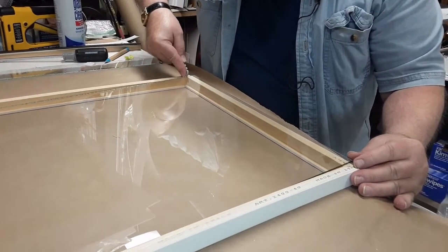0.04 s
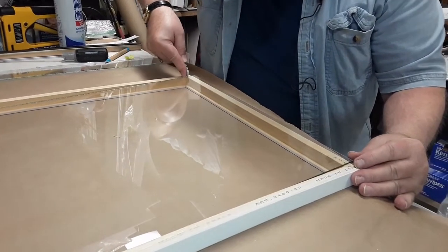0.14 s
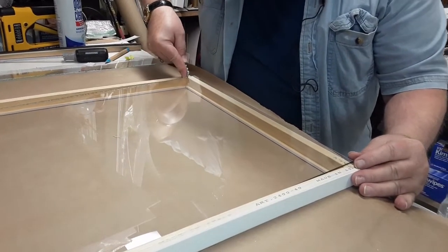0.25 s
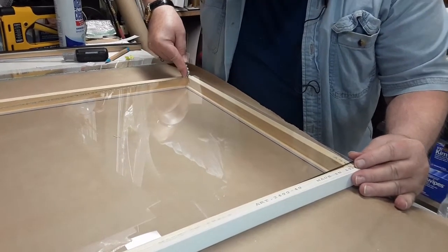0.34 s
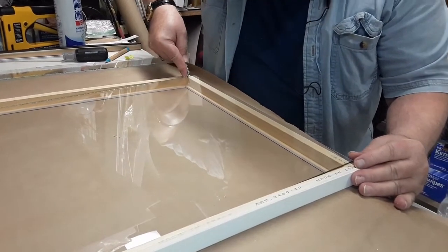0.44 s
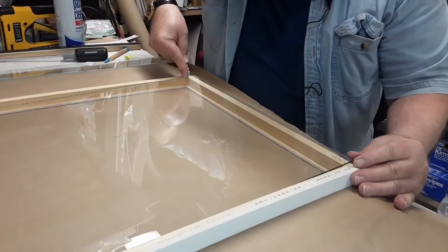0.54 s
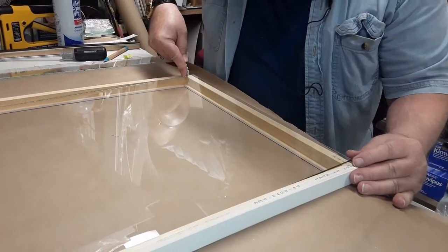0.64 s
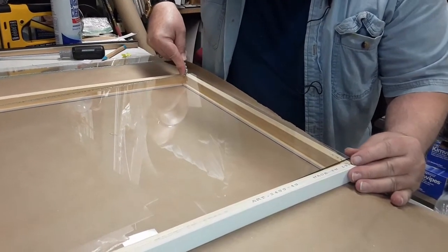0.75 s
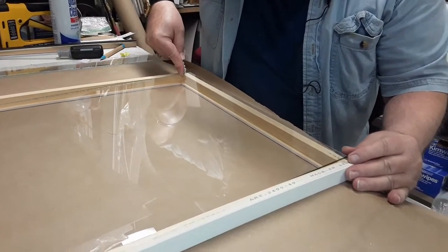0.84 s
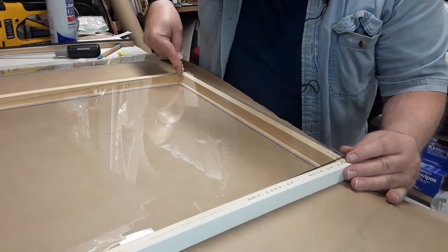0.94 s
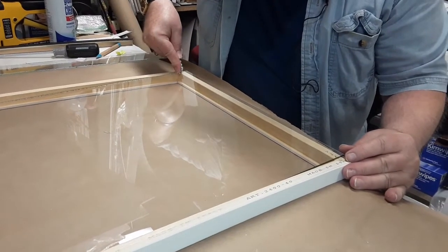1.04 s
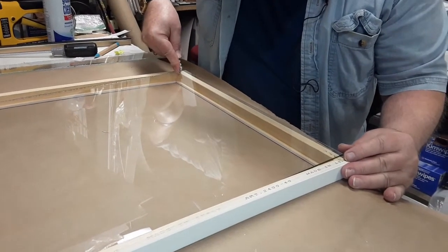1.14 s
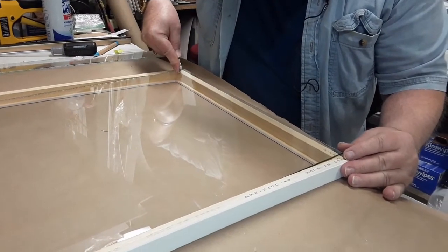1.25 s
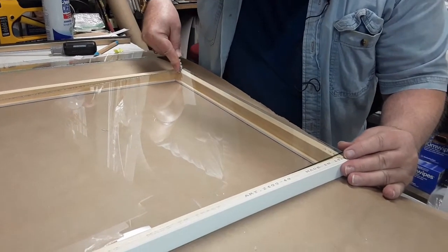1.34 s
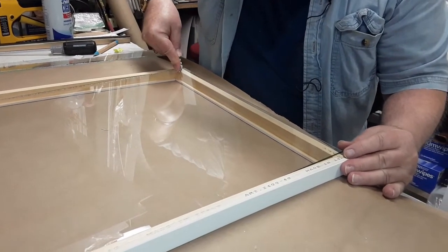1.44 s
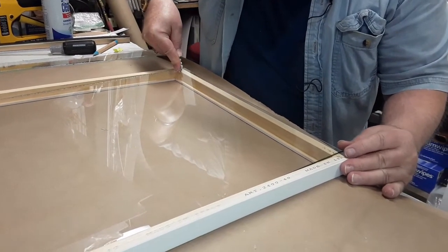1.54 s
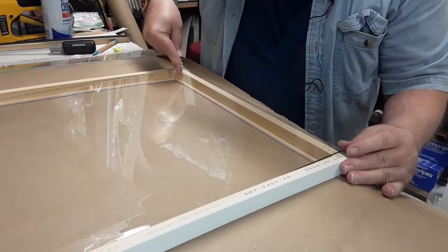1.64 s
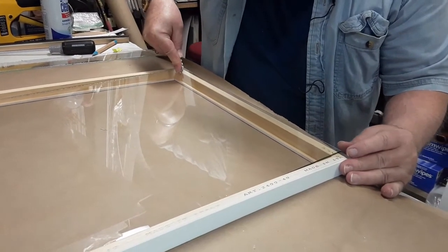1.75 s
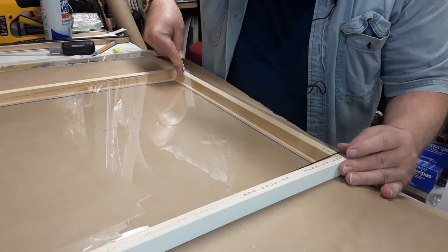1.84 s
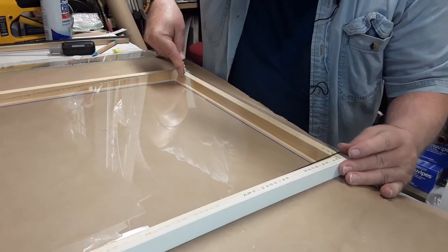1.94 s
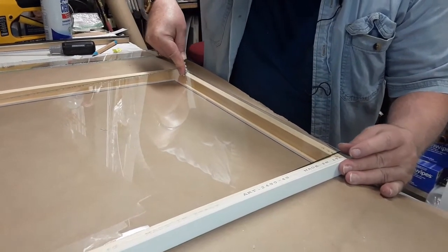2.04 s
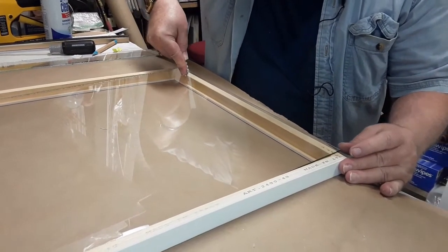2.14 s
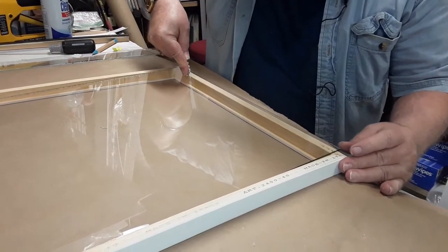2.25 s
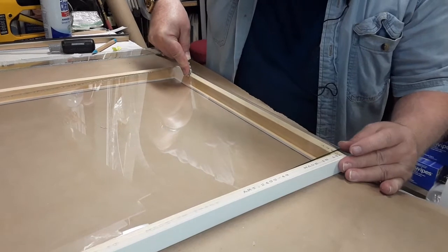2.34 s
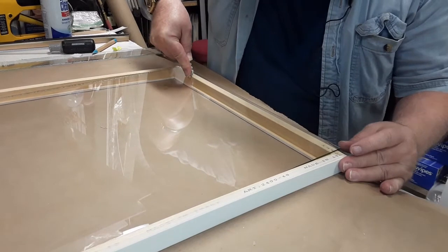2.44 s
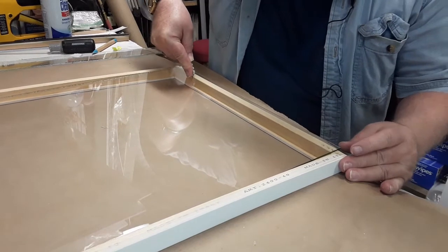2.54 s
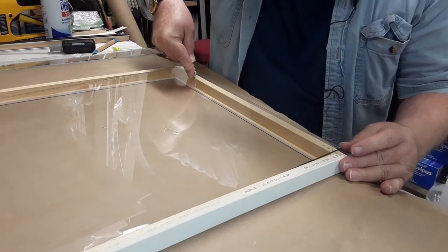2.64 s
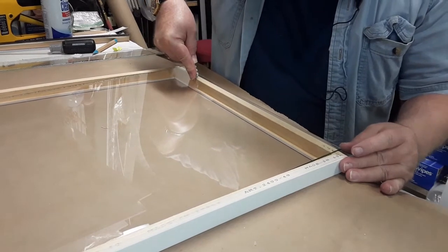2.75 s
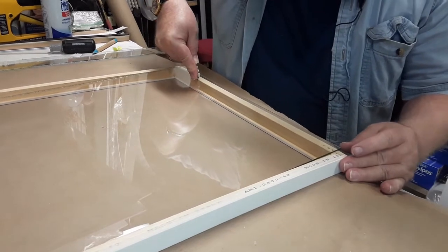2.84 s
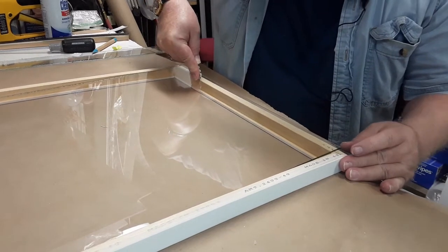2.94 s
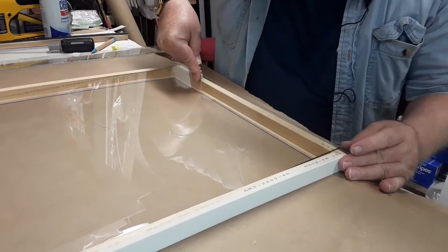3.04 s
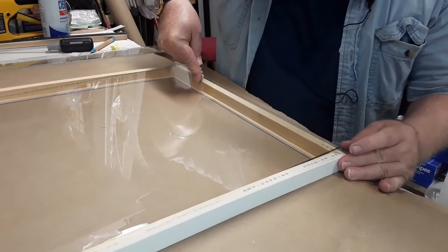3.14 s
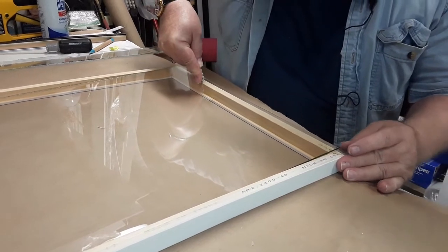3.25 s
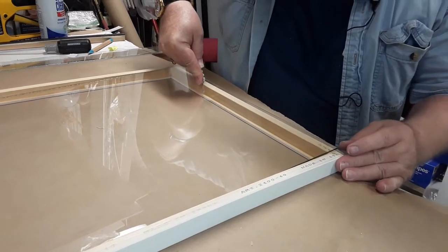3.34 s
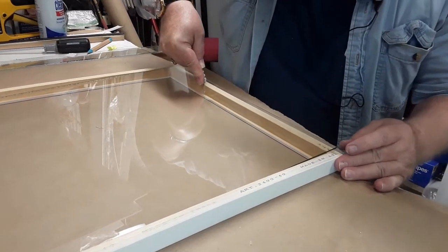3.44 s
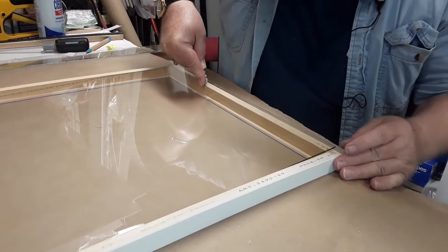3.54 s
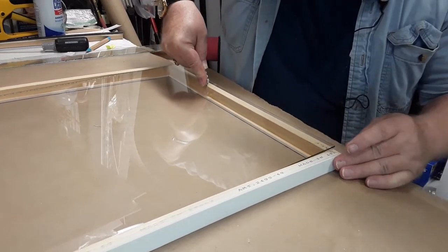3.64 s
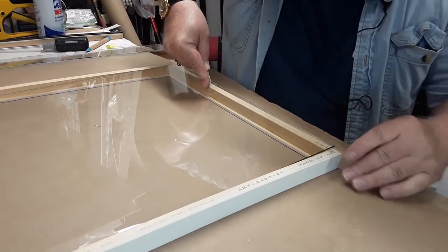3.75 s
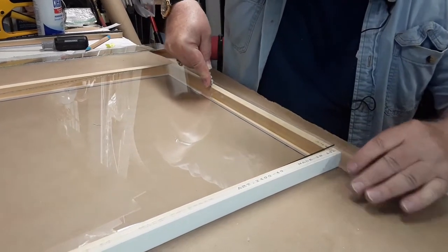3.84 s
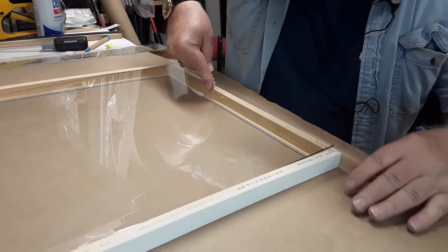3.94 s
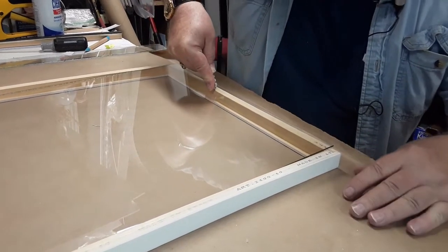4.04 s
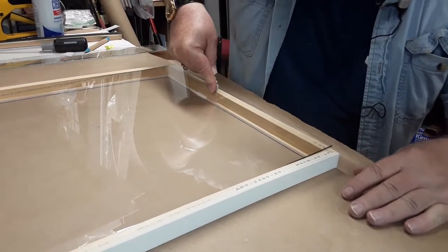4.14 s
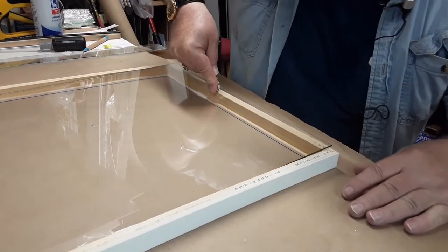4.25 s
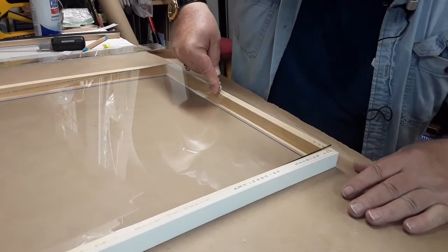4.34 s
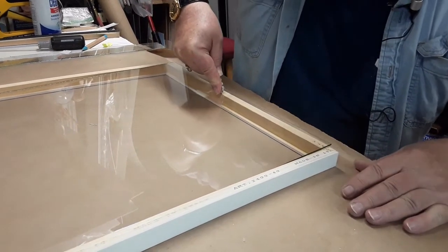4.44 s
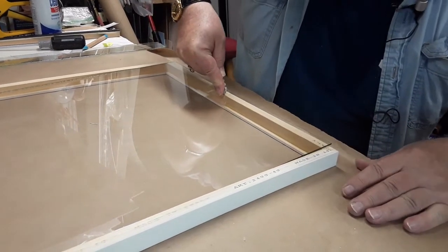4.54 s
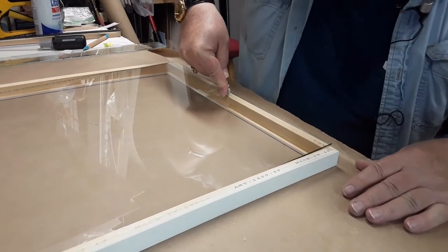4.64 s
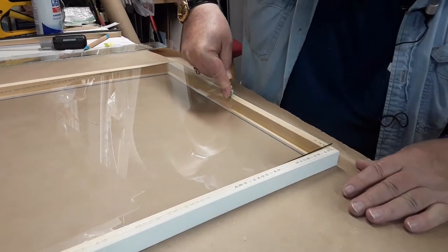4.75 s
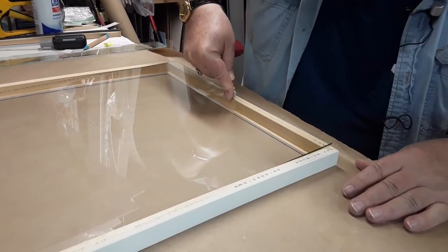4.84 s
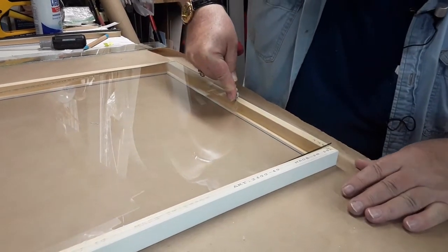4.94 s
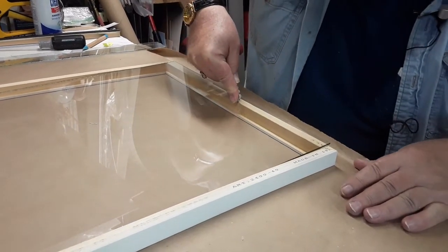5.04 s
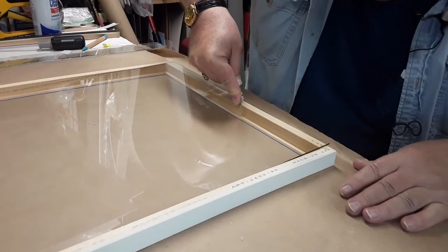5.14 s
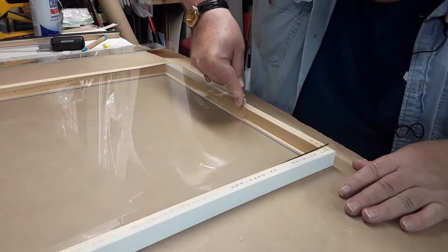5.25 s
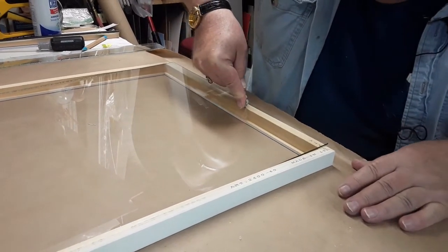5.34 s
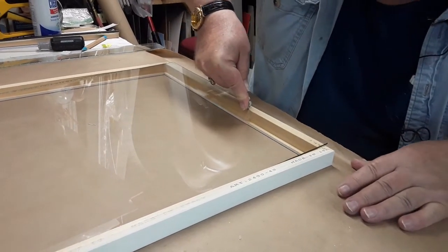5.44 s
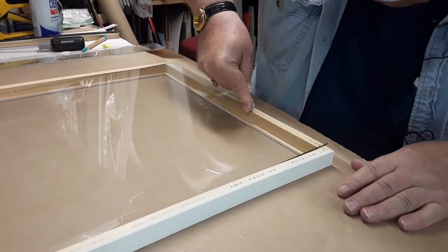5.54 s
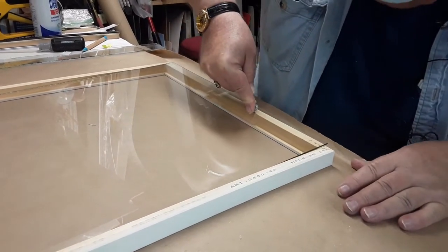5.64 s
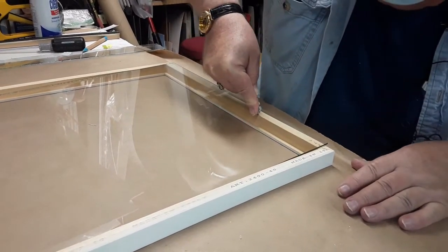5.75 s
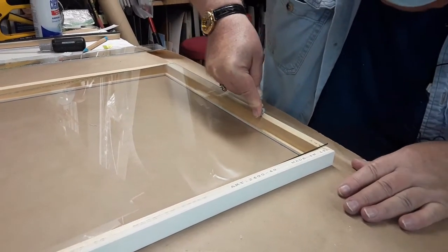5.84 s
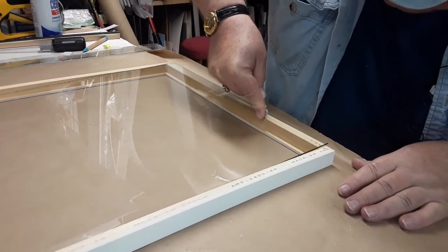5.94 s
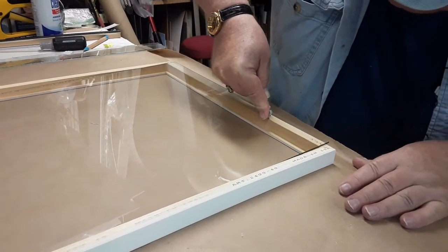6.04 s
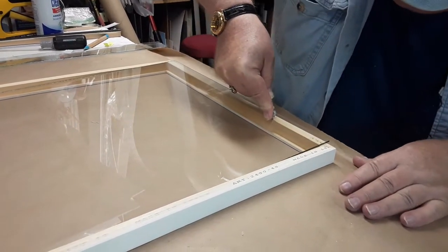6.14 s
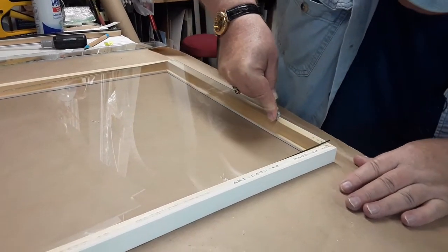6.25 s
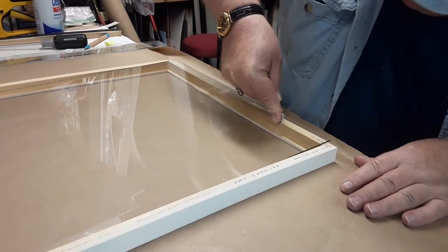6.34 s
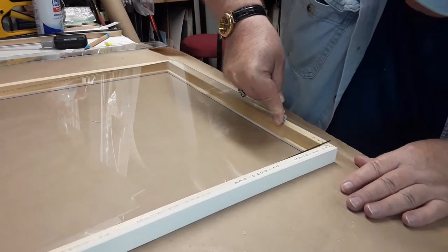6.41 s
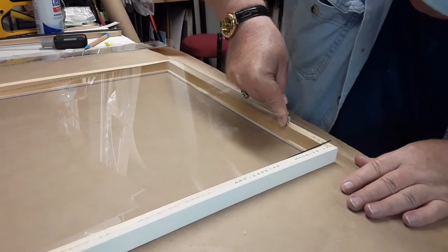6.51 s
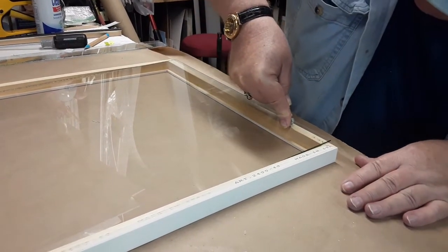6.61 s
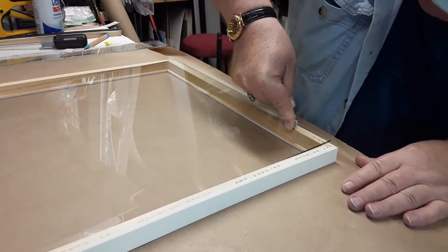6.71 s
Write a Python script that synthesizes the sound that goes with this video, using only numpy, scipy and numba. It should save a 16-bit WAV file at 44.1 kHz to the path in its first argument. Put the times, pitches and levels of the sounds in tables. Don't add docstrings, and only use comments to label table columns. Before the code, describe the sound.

Close-up of glass being scored on a wooden frame. Soft fan hum and airy rush throughout. Isolated dry clicks and brief scrapes crowd together into sharp, crackling slips, then become a sustained crisp scratch, bright and ringing, with shifting glassy tone and frequent momentary hang-ups. Small frame creaks flick by underneath. The indoor workshop adds only a short, light echo; the scratch is still going at the end.

```python
import sys
import numpy as np
from scipy import signal
from scipy.fft import rfft, irfft
from scipy.io import wavfile
from scipy.ndimage import uniform_filter1d
from numba import njit

SR = 44100
rng = np.random.default_rng(int(sys.argv[2]) if len(sys.argv) > 2 else 0)


def persist_wave(psi):
    counts = np.round(np.clip(psi, -1, 1) * 32767).astype(np.int16)
    wavfile.write(sys.argv[1], SR, np.atleast_2d(counts).T)


def to_linear_factor(level_db):
    exponent = np.asarray(level_db, float) / 20
    return 10 ** exponent


N = 298878
ROLL_START_S = 1.819
BLOCK = 256

# (time [s], peak level [dB], sliding time [s])
SLIPS = [(.001, -55, 0.0056), (.2463, -58, .006), (.2947, -69, .01), (0.5818, -36, 0.0037),
         (0.592, -52, 0.012), (0.73, -23, 0.011), (0.747, -24.5, 0.0051), (0.8661, -22, 0.0025),
         (0.873, -24, 0.0066), (1.169, -29.5, 0.011), (1.189, -25, 0.0094), (1.268, -27, 0.0079),
         (1.2884, -26.5, 0.01), (1.383, -24.5, 0.013), (1.397, -25.5, 0.006), (1.417, -21.5, 0.024),
         (1.45, -20, 0.005), (1.53, -16.5, 0.0029), (1.583, -20.5, 0.0036), (1.6045, -18, 0.0035),
         (1.6737, -15, 0.0046), (1.681, -26, 0.0025), (1.704, -16.5, 0.014), (1.723, -20.5, 0.0027),
         (1.734, -21.5, 0.0023), (1.7467, -15.5, 0.0029), (1.764, -19, 0.0029), (1.771, -18, 0.0028),
         (1.79, -17, 0.0028)]
# (time of release [s], hanging time [s], depth [dB])
HANGS = [(1.8405, 0.0056, -18), (1.9357, 0.021, -6), (1.9852, 0.016, -19), (1.9954, 0.0076, -21),
         (2.048, 0.018, -30), (2.083, 0.0099, -26), (2.192, 0.0074, 1), (2.264, 0.011, -16),
         (2.539, 0.0072, -10), (2.57, 0.0073, -16), (2.584, 0.014, -24), (2.613, 0.015, -31),
         (2.643, 0.0088, -15), (2.669, .005, -1), (2.72, 0.0077, -10), (2.742, 0.0061, -14),
         (2.824, 0.0046, 2), (2.9072, 0.021, -33), (2.926, 0.01, -20), (3.069, 0.014, -22),
         (3.134, .009, -18), (3.403, 0.0052, -11), (3.586, 0.0047, 4), (3.664, 0.0087, -11),
         (3.745, 0.012, -21), (3.819, 0.017, -28), (3.9, .01, -14), (3.928, 0.0081, -15),
         (3.952, 0.013, -19), (4.056, 0.01, -14), (4.13, 0.0088, -21), (4.235, 0.015, -11),
         (4.384, .007, -10), (4.882, 0.0077, -14), (4.916, .006, -11), (5.335, 0.0046, -7),
         (5.975, 0.01, -17), (6.153, 0.011, -20), (6.264, 0.01, -30), (6.314, 0.0077, -16),
         (6.364, .006, 1), (6.491, 0.0052, -9), (6.545, 0.011, -18)]
# (time of release [s], hanging time [s], depth [dB])
HITCHES = [(1.923, 0.0065, -15), (2.1237, 0.006, -16.0), (2.1744, 0.0067, -17), (2.1824, 0.0054, -14),
           (2.2115, 0.0061, -13.0), (2.237, 0.0051, -13.0), (2.3949, 0.0072, -15), (2.4635, 0.0064, -14),
           (2.529, 0.0048, -17.0), (2.7112, 0.0086, -14.0), (2.9828, 0.0052, -14), (3.0209, 0.0043, -16.0),
           (3.0785, 0.0073, -20), (3.1025, 0.0071, -16), (3.1685, 0.0065, -15.0), (3.199, 0.0049, -14.0),
           (3.2693, 0.0064, -14.0), (3.36, 0.0031, -14.0), (3.466, 0.0061, -11), (3.4863, 0.0034, -5),
           (3.5351, 0.0046, -12), (3.5561, 0.0049, -14.0), (3.6732, 0.0066, -19), (4.1642, 0.0038, -12.0),
           (4.197, 0.0063, -12.0), (4.4423, 0.0046, -16.5), (4.4735, 0.0052, -11.0), (4.621, 0.0052, -15.0),
           (4.7318, 0.0048, -18), (4.7528, 0.0057, -14), (4.8338, 0.0063, -12), (4.8703, 0.0094, -19),
           (4.9529, 0.0066, -17), (5.1419, 0.0041, -12.0), (5.2704, 0.0075, -15.0), (5.5598, 0.0062, -20),
           (5.584, 0.0049, -9), (5.6784, 0.0034, -14.0), (5.782, 0.0062, -12.0), (5.8297, 0.0047, -15),
           (5.889, 0.0072, -15), (5.9153, 0.0084, -18), (5.929, 0.011, -19), (6.0033, 0.0063, -17.0),
           (6.044, 0.0072, -12.0), (6.12, 0.0077, -20), (6.142, 0.0058, -14), (6.345, 0.0081, -15.0),
           (6.401, 0.0065, -11.0), (6.566, 0.0057, -14), (6.6388, 0.0084, -10), (6.6661, 0.0051, -21),
           (6.6847, 0.0093, -16), (6.7264, 0.0068, -16.0)]
# (time [s], level [dB])
PRESSURE = [(1.83, -24), (1.88, -24.5), (1.97, -26.5), (2.34, -25), (2.44, -26.5), (2.55, -23.5),
            (2.59, -27), (2.66, -26), (2.92, -25.5), (2.97, -24.5), (3.22, -26), (5.38, -25), (5.58, -25.5),
            (5.63, -24.5), (5.96, -25.5), (6.39, -25), (6.58, -26.5), (6.78, -24)]
# (time [s], share of the sag [1])
STUTTER = [(1.83, 0.77), (2.4, 0.76), (2.8, 1.1), (3.3, 1.1), (3.45, 1.2), (3.56, 1.1), (3.61, .9),
           (4.0, 1.0), (4.6, 0.75), (5.0, 0.49), (5.25, 0.62), (5.7, 0.64), (6.2, 0.66), (6.45, 1.4),
           (6.78, 1.2)]
# (time [s], peak level [dB])
TICKS = [(3.4324, -16), (3.457, -18), (3.4664, -10), (3.486, -9), (3.4907, -12), (3.4984, -16),
         (3.5014, -16), (3.5044, -16), (3.5124, -17), (3.5154, -12), (3.524, -8), (3.5354, -18),
         (3.538, -14), (3.5458, -16), (3.556, -17), (3.5604, -17), (3.5664, -14)]
# (time [s], distance [node spacings of the upper ring])
TRAVEL = [(1.82, -.35), (2.8, 2.0), (3.26, 3.0), (3.96, 5.0), (4.38, 6.0), (4.65, 7.0), (4.97, 8.0),
          (5.63, 10.0), (6.78, 13.25)]
# (frequency [Hz], extra level [dB])
SPECIAL_MODES = [(2010, 2.5), (2250, 2), (2810, 3.5), (3250, 1.5), (3420, 2), (5250, -4), (6700, 4),
                 (7900, 5), (8080, 2), (8510, 0), (8780, 1.5), (9470, -10), (10900, 7.5), (11400, 4),
                 (11900, 4.5), (13050, -10), (14300, -5), (14900, 8)]
# (time [s], frequency [Hz], half length [s], gain [dB])
LOW_ANTINODES = [(1.938, 6680.0, 0.14, 11), (1.956, 6370.0, 0.12, 12.5), (1.974, 1980, 0.2, 7),
                 (2.37, 6680.0, 0.14, 8.0), (2.925, 6680.0, 0.21, 10), (3.09, 6680.0, 0.5, 5),
                 (3.1, 5250.0, 0.34, 9), (3.67, 3260, 0.15, 8.5), (3.78, 3440, 0.21, 12),
                 (4.227, 6640, 0.23, 12), (4.48, 3440, 0.32, 10.5), (4.572, 6680.0, 0.66, 6.0),
                 (4.64, 1962, 0.43, 6.5), (4.76, 6730, 0.69, 5), (4.807, 6900, 0.12, 13),
                 (4.96, 5320, 0.3, 10), (5.185, 3490.0, 0.24, 10.5), (5.18, 6930.0, 0.12, 6),
                 (5.38, 6220, 0.18, 9.5), (5.69, 2792, 0.77, 8.5), (5.74, 6330.0, 0.17, 7.5),
                 (5.764, 3450.0, 0.19, 10), (5.93, 7100, 0.14, 7), (5.96, 6720.0, 0.23, 5),
                 (6.14, 6480, 0.16, 7.5), (6.61, 5145, 0.12, 8.0), (6.693, 6750, 0.096, 7.5)]
# (time [s], frequency [Hz], half length [s], gain [dB])
HIGH_ANTINODES = [(1.9, 8790.0, 0.041, 5.2), (2.21, 8950, 0.15, 9), (2.25, 7700, 0.17, 9.2),
                  (2.4, 8420, 0.83, 4.5), (2.41, 8740.0, 0.4, 4.3), (2.58, 8460, 0.17, 9.6),
                  (2.69, 7490.0, 0.16, 8.7), (2.7, 8310.0, 0.73, 5.6), (3.07, 8570.0, 0.16, 12),
                  (3.07, 8740.0, 0.18, 8.3), (3.42, 7960, 0.3, 5.6), (3.75, 8310.0, 0.32, 8.0),
                  (3.81, 8790.0, 0.11, 9.7), (3.84, 9400, 0.12, 10), (3.9, 7820, 0.12, 4.2),
                  (3.97, 8270.0, 0.71, 6.2), (4.23, 8600, 0.2, 9.3), (4.44, 7930, 0.43, 6.0),
                  (4.98, 7800.0, 0.34, 6.0), (5.11, 8800, 0.15, 8.0), (5.22, 8500, 0.2, 7.2),
                  (5.3, 7880.0, 0.1, 7.5), (5.66, 8210, 0.12, 6.3), (5.67, 7940, 0.12, 6),
                  (5.69, 8440.0, 1.2, 4.6), (5.82, 8550, 0.097, 12.7), (5.93, 8790.0, 0.61, 4.5),
                  (6.1, 8530.0, 0.52, 5.6), (6.1, 11000, 0.35, 7.4), (6.12, 8140, 0.64, 5.6),
                  (6.47, 8100.0, 0.3, 4.7), (6.61, 11270, 0.15, 9.0), (6.67, 8100, 0.078, 2.6),
                  (6.7, 7920.0, 0.082, 7.6)]
# (frequency [Hz], level [dB per Hz])
CORNER_COLOUR = [(760, -66), (1300, -19), (2040, -2.5), (2570, -16), (2860, -10.5), (3490, -8.5),
                 (4580, -27.5), (5090, -11.5), (5600, -12.5), (6250, -9), (6700, -3.5), (7250, -8.5),
                 (8520, -1), (10400, -17.5), (12400, -20), (16000, -35)]
# (frequency [Hz], level [dB per Hz])
OPEN_COLOUR = [(590, -42.5), (1000, -19.5), (1280, -17.5), (1980, -12.5), (2390, -14), (3380, -10),
               (4570, -20.5), (5130, -12.5), (5970, -11.5), (6780, -6.5), (7350, -9), (8350, -4.5),
               (10200, -16.5), (12100, -16.5), (16000, -33.5)]
# (frequency [Hz], width [Hz], gain [dB])
BENCH_NOTCHES = [(2430, 110, -1), (4700, 220, -2), (10440, 230, -4), (12750, 190, -3), (13800, 300, -3)]
# (time [s], peak level [dB], first pitch [Hz], last pitch [Hz], length [s])
CREAKS = [(0.587, -42, 2300, 1400, 0.014), (1.287, -24.5, 2640, 1480, 0.0082),
          (1.344, -34, 2150, 1600, 0.0059), (2.443, -27, 2240, 1500, 0.0083),
          (3.1465, -27, 1250, 600, 0.005), (3.182, -22.5, 2610, 1155, 0.0103),
          (3.281, -26, 2960, 1310, 0.0095), (3.307, -32, 2360, 1500, 0.0085),
          (3.477, -27.5, 2260, 1170, 0.0063), (3.882, -30, 1790, 1290, 0.0095),
          (4.121, -22.5, 1920, 1390, 0.0052), (4.291, -62, 2120, 1600, 0.0043),
          (4.365, -20.5, 2770, 1630, 0.0064), (5.262, -25, 2210, 1690, 0.0038),
          (6.056, -27.5, 1020, 443, 0.0078), (6.057, -29, 453, 151, 0.013), (.4, -42, 482, 450, 0.11),
          (0.525, -48, 563, 617, .12)]
# (frequency [Hz], time to fall by 60 dB [s])
ROOM_DECAY = [(1000, 0.59), (4000, 0.55), (6500, 0.17), (9000, 0.14), (15000, 0.33)]
# (frequency [Hz], level [dB per Hz])
AIR_COLOUR = [(15, -55), (30, -34), (60, -13.5), (137, -7.5), (270, -8), (560, -11), (1040, -12),
              (1610, -17.5), (2100, -23), (3600, -34), (4300, -40), (6200, -52), (9500, -59), (16000, -60)]
# (frequency [Hz], level [dB], width [Hz])
DUCTS = [(57.8, -58, 4.9), (175.2, -57, 7.1), (202.5, -50, 12), (282, -77, 2.1), (463, -57.5, 6.1),
         (1031, -57, 3.2), (1122, -54, 150), (8200, -76.5, 1270)]
# (frequency [Hz], level [dB], wander [Hz])
MOTOR_TONES = [(139.8, -44.5, 0.36), (559.6, -58.5, 0.7), (764, -59, 1.85), (934, -59, 2.65),
               (999, -59, 1.62), (1847, -58.5, 2.25), (14030, -81, 35), (101.4, -53.5, 0.6)]


def sliding(t, fade_s=0.0014, rise_s=0.00038, bite=1.28, bite_s=0.0019, slip_db=-8.0, regrip=0.55,
            tick_db=-2.0, tick_s=0.00048):
    force = to_linear_factor(np.interp(t, *np.transpose(PRESSURE))) * (t > ROLL_START_S)
    force *= to_linear_factor(-0.48 * walk(130., N) + 0.5 * walk(35., N))
    crawl_db = np.interp(t, (3.44, 3.485, 3.56, 3.58), (0, -7.0, -7.0, 0))
    force *= chatter(t) * to_linear_factor(crawl_db)
    for free, hang, depth_db in [(ROLL_START_S, 1, 0)] + HANGS + HITCHES:
        stuck = np.clip(1 + (t - free) / hang, 0, 1) ** 1.06 * (t < free)
        force *= to_linear_factor(depth_db * stuck)
        force *= 1 + regrip * np.exp(-np.abs(t - free) / bite_s) * (t > free)
    for start, db, slide in SLIPS:
        age = np.maximum(t - start, 0)
        attack = np.minimum(age / rise_s, 1) * (1 + bite * np.exp(-age / bite_s))
        fade = np.exp(-np.maximum(age - slide, 0) / fade_s)
        force += to_linear_factor(db + slip_db) * attack * fade
    for start, db in TICKS:
        force += to_linear_factor(db + tick_db) * np.exp(-np.abs(t - start) / tick_s) * (t > start)
    return force


def chatter(t, min_s=.003, more_s=.007, sag_db_per_s=-1200.0, spread_db=-0.5):
    length_chance, level_chance = rng.random((N // 100, 2)).T
    grips = np.cumsum(min_s + more_s * length_chance ** 2)
    k = np.searchsorted(grips, t)
    age = t - np.append(0, grips)[k]
    sag_db = sag_db_per_s * age * np.interp(t, *np.transpose(STUTTER))
    uneven_db = spread_db * (2 * level_chance[k] - 1)
    gain = uniform_filter1d(to_linear_factor(sag_db + uneven_db), size=24)
    return gain / np.sqrt(uniform_filter1d(gain ** 2, size=4000))


def cracks(rate_hz=6000., spread_db=0.4, rub=0.35):
    hit = rng.random(N) < rate_hz / SR
    sizes = hit * to_linear_factor(spread_db * rng.exponential(size=N)) * rng.choice([-1, 1], N)
    return level(level(sizes, 0) + rub * rng.standard_normal(N), 0)


def pane_modes(count=300, t60_s=0.022, shorter=0.36, strong_t60_s=0.034):
    pitch_chance, decay_chance = rng.random((count, 2)).T
    strong_hz, strong_db = np.transpose(SPECIAL_MODES)
    hz = np.append(900 + (np.arange(count) + pitch_chance) * 15400 / count, strong_hz)
    extra_db = np.append(np.zeros(count), strong_db)
    decay_s = np.append(t60_s * (0.5 + 1.9 * decay_chance), np.full(len(strong_hz), strong_t60_s))
    decay_s *= (hz / 5000) ** -shorter
    return np.array([hz, extra_db, decay_s])[:, np.argsort(hz)]


def mode_shapes(hz, t, travel=0.65, kinship=0.589, creep=.3, jerk=0.23):
    angle, step = rng.standard_normal((len(hz), 2)).T
    turns = travel * np.sqrt(hz / 8000) * (1 + 0.4104 * uniform_filter1d(angle, size=4))
    rolled = np.maximum((np.interp(t, *np.transpose(TRAVEL)) - TRAVEL[0][1]) / 2, 0)
    way = rolled + jerk * np.minimum(t - ROLL_START_S, 0)
    start_phase = np.cumsum(kinship * step - creep)
    return np.cos(2 * np.pi * np.outer(turns, way) + start_phase[:, None])


def antinodes(hz, t, width_hz=60.0, gain=1.047, glide_per_s=0.031, longest_s=0.42):
    hz = hz[:, None]
    spots = []
    for s, f, half, db in LOW_ANTINODES + HIGH_ANTINODES:
        off_pitch = (hz - f * (1 + glide_per_s * (t - s))) / width_hz
        off_time = (t - s) / min(half, longest_s)
        spots.append(db * np.exp(-off_pitch ** 2 - off_time ** 2))
    place = np.interp(t, *np.transpose(TRAVEL))
    ends = (0, TRAVEL[-1][1])
    centre_hz = np.interp(place, ends, (8600, 8370))
    sway_hz = -np.interp(place, ends, (110, 383)) * np.cos(2 * np.pi * place)
    upper_db = 5.5 * np.exp(-((hz - centre_hz - sway_hz) / 227.0) ** 2)
    gap_db = -5.5 * np.exp(-((hz - 7280.0 - 0.4 * sway_hz) / 110.0) ** 2)
    return gain * np.max(spots, axis=0) + upper_db + gap_db


def pane(force, wedged_db=10.5, hold_per_db=0.17, direct_db=-12.0):
    hz, extra_db, decay_s = pane_modes()
    poles = np.exp(2j * np.pi * hz / SR - np.log(1000) / (decay_s * SR))
    t = np.arange(N // BLOCK + 2) * BLOCK / SR
    near_db = antinodes(hz, t)
    shape = mode_shapes(hz, t)
    shape += hold_per_db * np.maximum(near_db, 0)
    shape *= rng.choice([-1, 1], (len(hz), 1)) * (1 - np.abs(poles))[:, None]
    overlap = 1 / (1 - poles * np.exp(-2j * np.pi * hz[:, None] / SR))
    for _ in range(3):
        energy = np.abs(overlap @ shape) ** 2
        shape /= np.sqrt(uniform_filter1d(energy, size=8, axis=0))
    sound = 2 * ring(force, poles, shape * to_linear_factor(extra_db[:, None] + near_db), BLOCK)
    away = np.interp(np.arange(N) / SR, (1.47, 1.96), (0, 1))
    wedged = to_linear_factor(wedged_db) * (1 - away) * rng.choice([-1, 1], N)
    sound += to_linear_factor(direct_db) * force * (away + wedged)
    in_corner = to_linear_factor(8.0) * (1 - away) * colour(sound, CORNER_COLOUR)
    in_open = to_linear_factor(11.0) * away * colour(sound, OPEN_COLOUR)
    return in_corner + in_open


@njit
def ring(force, poles, coupling, block):
    out = np.zeros(len(force))
    for m in range(len(poles)):
        z, p = 0j, poles[m]
        for i in range(len(force)):
            b, u = i // block, (i % block) / block
            push = coupling[m, b] * (1 - u) + coupling[m, b + 1] * u
            z = z * p + force[i] * push
            out[i] += z.imag
    return out


def colour(x, table, size=1024):
    hz = np.fft.rfftfreq(size, 1 / SR)
    gain_db = on_log(hz, table)
    for f, width, db in BENCH_NOTCHES:
        gain_db = gain_db + db * np.exp(-((hz - f) / width) ** 2)
    cepstrum = irfft(np.log(to_linear_factor(gain_db)))
    cepstrum[1:size // 2] *= 2
    cepstrum[size // 2 + 1:] = 0
    return signal.fftconvolve(x, irfft(np.exp(rfft(cepstrum))))[:N]


def frame(t, rough=0.19, rasp=0.3):
    out = np.zeros(N)
    for start, db, first, last, length in CREAKS:
        i = int(start * SR)
        u = t[:int(length * SR)] / length
        wobble = walk(1500., size=8192)[:len(u)] * min(.02 / length, 1)
        hz = first * (last / first) ** u * (1 + rough * wobble)
        phase = 2 * np.pi * np.cumsum(hz) / SR
        swell = np.sin(np.pi * u ** 1.17) ** 2
        cycles = np.sin(phase) + rasp * np.sin(1.3 * phase + 3 * wobble)
        out[i:i + len(u)] += to_linear_factor(db) * swell * cycles
    return out


def room(x, wet_db=-10.5, gap_s=0.0035):
    t = np.arange(SR // 2) / SR
    tail = 0
    for hz in (700, 1000, 1400, 2000, 2800, 4000, 5600, 8000, 11200, 16000):
        sos = signal.butter(2, (hz / 1.19, hz * 1.19), "band", fs=SR, output="sos")
        band = signal.sosfilt(sos, rng.standard_normal(len(t)))
        tail = tail + band * to_linear_factor(-60 * t / on_log(hz, ROOM_DECAY)) * (t > gap_s)
    tail = tail / np.sqrt(np.sum(tail ** 2))
    return x + to_linear_factor(wet_db) * signal.fftconvolve(x, tail)[:N]


def fan():
    out = level(shaped(lambda f: to_linear_factor(on_log(f, AIR_COLOUR))), -43.5)
    for hz, db, width in DUCTS:
        out += level(shaped(lambda f: 1 / (1 + (2 * (f - hz) / width) ** 2)), db)
    swell_db = np.interp(np.arange(N) / SR, (0.61 - .05, 0.61, 3.35, 3.35 + .2), (0, 6, 6, 0))
    for k, (hz, db, wander) in enumerate(MOTOR_TONES):
        phase = 2 * np.pi * np.cumsum(hz + wander * walk(6., N)) / SR
        tone = level(to_linear_factor(1.2 * walk(1.34, N)) * np.sin(phase), db)
        out += tone * to_linear_factor(swell_db) if k == 1 else tone
    return out


def level(x, db):
    return x * to_linear_factor(db) / np.sqrt(np.mean(x ** 2))


def on_log(hz, table):
    f, v = np.transpose(table)
    return np.interp(np.log(np.maximum(hz, 1)), np.log(f), v)


def shaped(gain):
    return irfft(rfft(rng.standard_normal(N)) * gain(np.fft.rfftfreq(N, 1 / SR)), N)


def walk(rate_hz, size):
    k = int(SR / rate_hz)
    return uniform_filter1d(np.repeat(rng.standard_normal(size // k + 1), k), k)[:size]


def scene():
    t = np.arange(N) / SR
    glass = pane(sliding(t) * cracks())
    return (room(glass + frame(t)) + fan())[None]


def low_pass(x):
    return signal.sosfilt(signal.butter(12, 16480, fs=SR, output="sos"), x)


def record(dry):
    low = signal.butter(3, 40, "high", fs=SR, output="sos")
    top = signal.ellip(14, .3, 60, 15760, fs=SR, output="sos")
    mix = signal.sosfilt(np.vstack([low, top]), dry) - .0007
    return low_pass(mix)


dry = scene()
out = record(dry)
persist_wave(out)
```